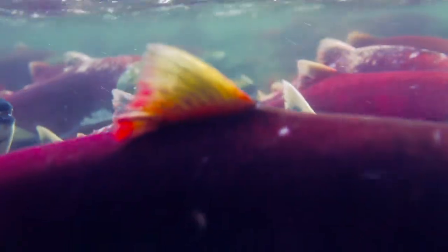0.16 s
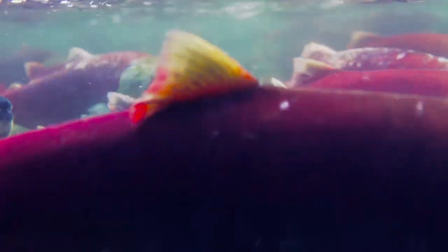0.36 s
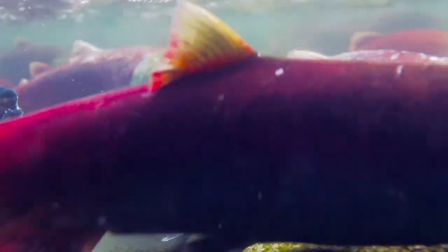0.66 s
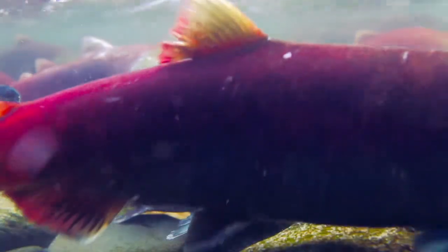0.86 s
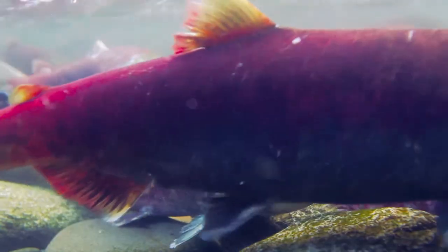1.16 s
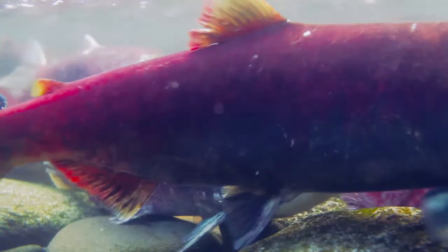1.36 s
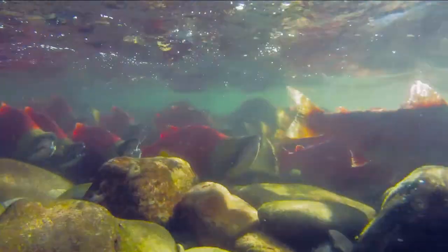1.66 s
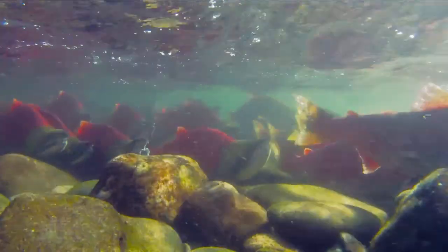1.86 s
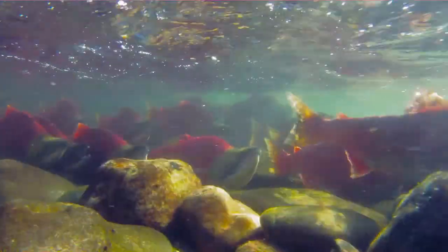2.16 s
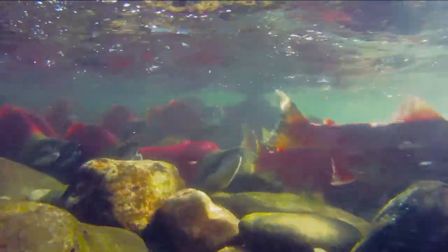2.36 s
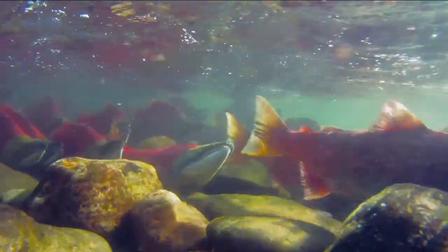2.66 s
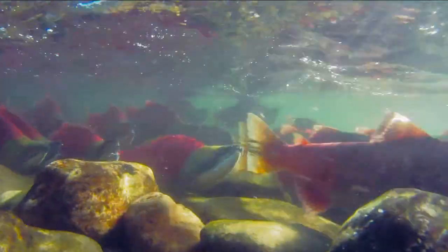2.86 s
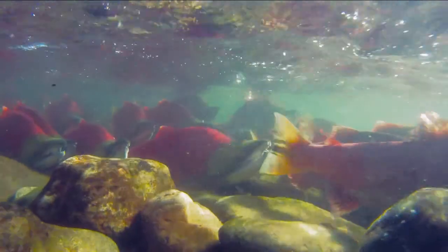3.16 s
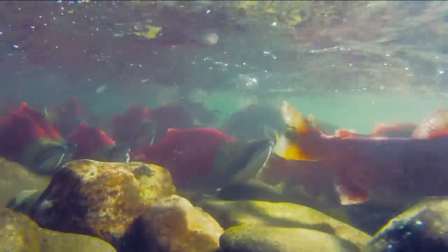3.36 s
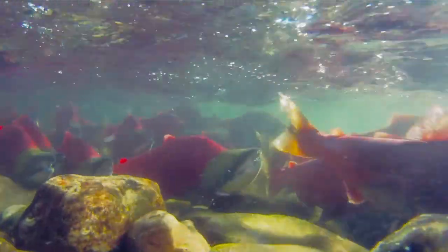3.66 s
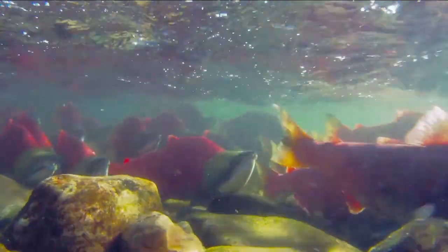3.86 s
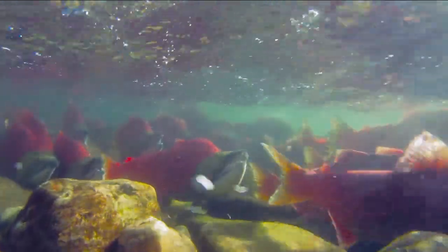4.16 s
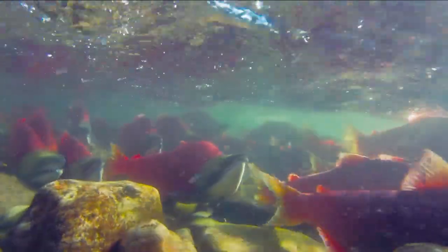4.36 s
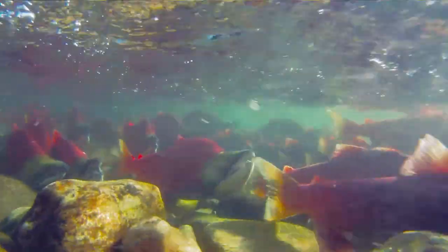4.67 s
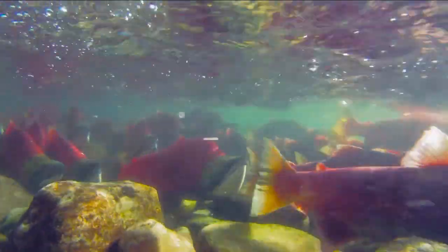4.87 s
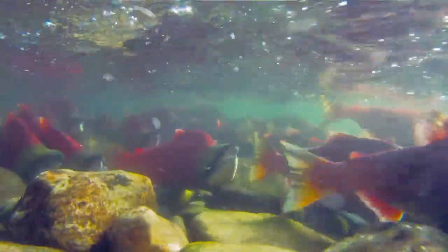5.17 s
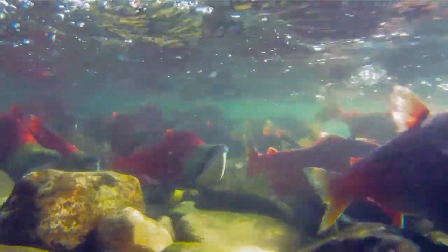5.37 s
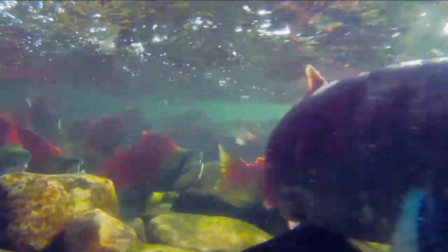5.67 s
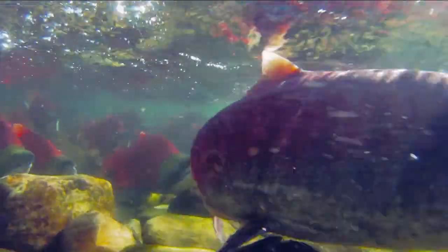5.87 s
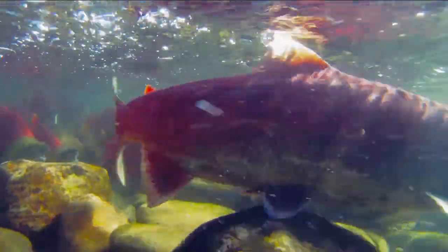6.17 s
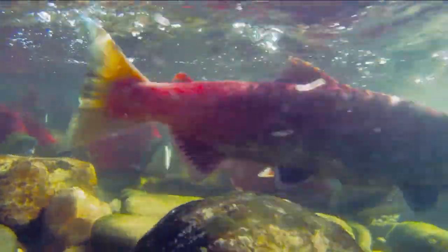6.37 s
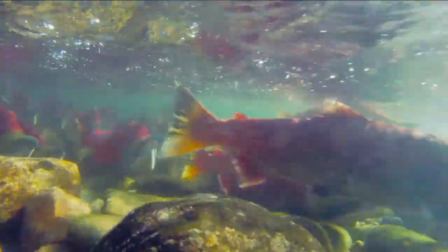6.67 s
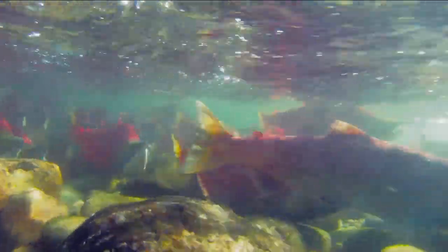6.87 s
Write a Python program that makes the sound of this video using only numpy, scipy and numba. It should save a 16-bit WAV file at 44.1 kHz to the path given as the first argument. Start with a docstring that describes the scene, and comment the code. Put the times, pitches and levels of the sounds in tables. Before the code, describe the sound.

A shallow stream rushes steadily over stones in open air, with crisp little splashes and a few bubbly plops around one and a half seconds. It fades by two and a half seconds into a quiet underwater sound: low soft rumble, faint simmer and isolated bubble pops. The bubbles gradually crowd together into hollow gurgling knocks, with grit ticking on the bed. The submerged microphone is very close, almost dry, with a glassy edge on each bubble.

```python
"""A shallow river, above and below the surface

From the bank, small bubbles, random kicks and noise merge into a rush over gravel, with noisy splashes.
It fades into the sound below: bubbles snap and ring, trapped air gurgles in knocks, and grit ticks in short
noise bursts, over a soft simmer of far bubbles and a low rumble of noise.
A sample-and-hold effect mirrors the underwater sound higher up, so every bubble gets a glassy glint."""
import sys
import numpy as np
from scipy import signal
from scipy.fft import rfft, irfft
from scipy.io import wavfile
from scipy.ndimage import uniform_filter1d
from numba import njit

SR = 44100
rng = np.random.default_rng(int(sys.argv[2]) if len(sys.argv) > 2 else 0)


def to_wav(s):
    """Save 16-bit WAV."""
    ch = np.atleast_2d(s).T  # columns
    pcm = np.round(np.clip(ch, -1, 1) * 32767)  # PCM
    wavfile.write(sys.argv[1], SR, pcm.astype(np.int16))


N = 309582
TIME = np.arange(N) / SR  # seconds

# the river in the open air, fading as the listener goes under: (time [s], level [dB], spray [dB])
RIVER_LEVELS = [(0, -23, -5.5), (.6, -22.5, -7.5), (1.42, -25, -8.5), (1.56, -23.5, -3), (1.74, -27.5, 1.5),
                (1.9, -27.5, 0.5), (2.3, -40, 1.5), (2.42, -43, -8), (2.52, -70, 2)]
# colour of the rushing water: (frequency [Hz], filter gain [dB])
RIVER_COLOUR = [(24, -37), (40, -12), (60, -11.5), (118, -12.5), (199, -2), (345, -8), (422, -5),
                (585, -10.5), (810, 1), (990, -6), (1520, -10), (2100, -9.5), (4340, -21.5), (6820, -19),
                (16000, -50)]
# hollows between the stones that ring with the rush: (frequency [Hz], width [Hz], level [dB])
STONE_HOLLOWS = [(237, 110, -18), (402, 190, -16), (710, 130, -16), (1900, 130, -6), (2498, 38, 2.5),
                 (3390, 850, -4.5)]
# wavelets that break on the stones: (time [s], level before fading [dB], decay [ms], centre [Hz])
SPLASHES = [(0.429, -26.5, 4.4, 6300), (0.653, -26.5, 4.6, 4200), (0.715, -23.5, 4.3, 4860),
            (1.458, -25.5, 5.5, 2970), (1.523, -17.5, 9, 2000), (1.571, -25.5, 12, 2000),
            (1.662, -18.5, 4.7, 2800), (1.722, -32, 20, 6230), (2.358, -35, 4.1, 4130)]
# single bubbles close by: (time [s], pitch [Hz], level [dB], swell [ms])
NEAR_BUBBLES = [(.594, 620, -24.5, 4), (1.091, 2310, -19.5, 1), (1.143, 2330, -13.5, 1),
                (1.452, 813, -9, 3.4), (1.485, 795, -23, 2.5), (1.576, 1190, -19, 1.3),
                (1.608, 756, -12, 2.8), (1.617, 1840, -14.5, 0.88), (1.797, 700, -17.5, 1.6),
                (2.142, 1830, -22.5, .5), (2.474, 1310, -21, 2.6), (2.498, 2990, -24.5, .8),
                (2.5, 1844, -18.5, 0.27), (2.52, 1542, -4.5, 0.97), (2.598, 1620, -23.5, 1.2),
                (2.607, 2200, -25.5, 0.55), (2.639, 1463, -25, 2.9), (2.65, 2220, -26, .5),
                (2.685, 2210, -18.5, 0.41), (2.704, 2300, -24, 0.34), (2.74, 754, -27.5, 3),
                (2.779, 1410, -32.5, 6.6), (2.878, 3340, -29.5, .5), (3.317, 790, -26, 4.6),
                (3.319, 2860, -32, .6), (3.367, 2320, -28, 0.66), (3.417, 2850, -23, .5),
                (3.422, 770, -23, 7.3), (3.728, 2030, -30, 0.34), (3.818, 1920, -28, 2.2),
                (3.822, 2400, -18, 3), (3.942, 3720, -22, 0.28), (3.954, 1400, -26.5, 4.8),
                (3.982, 1450, -30, 2.7), (4.101, 793, -22.5, 2.6), (4.158, 1740, -14, .2),
                (4.191, 3500, -22.5, 1.3), (4.231, 2630, -15, 0.24), (4.259, 767, -24, 7.1),
                (4.261, 2390, -21, 3.3), (4.266, 3460, -14, 0.16), (4.353, 1070, -31.5, 7.7),
                (4.654, 1504, -21, 11), (4.661, 4120, -21, 0.49), (4.689, 2670, -17, 0.13),
                (4.715, 3370, -21.5, .5), (4.783, 765, -20, 1.2), (4.792, 1324, -17, 5.7),
                (4.794, 1665, -14, 0.16), (4.854, 810, -19, 0.58), (4.875, 1075, -20, 19),
                (4.876, 816, -13, 2.9), (4.921, 1720, -18, 0.42), (4.951, 777, -19, 2.3),
                (4.951, 1504, -21, 4.4), (4.993, 2350, -25.5, 3.3), (5.004, 1406, -20.5, 0.46),
                (5.008, 717, -21.5, 2.2), (5.048, 624, -16.5, 0.59), (5.133, 1600, -13, 2),
                (5.14, 1073, -16.5, .3), (5.167, 2670, -21.5, 1), (5.532, 1885, -15.5, 0.27),
                (5.55, 1520, -23.5, 7), (5.568, 768, -24.5, 2.3), (5.617, 1580, -21, 0.26),
                (5.633, 803, -25, 4.5), (5.69, 1550, -15, 0.2), (5.73, 1920, -18.5, .3),
                (5.864, 3580, -19.5, 0.17), (5.865, 1465, -22, 2.3), (5.875, 740, -17.5, 1.1),
                (5.897, 2040, -24.5, 3.3), (6.024, 1174, -10.5, 1.3), (6.107, 2910, -16.5, 1.4),
                (6.125, 1540, -19.5, 2), (6.21, 734, -10, 1.2), (6.214, 3370, -12.5, 0.6),
                (6.533, 3560, -14, 0.17), (6.675, 1437, -10, 2.9), (6.677, 3370, -19.5, 0.68),
                (6.678, 738, -11.5, 1.4), (6.708, 3320, -14.5, 0.49), (6.761, 628, -23, 6.4),
                (6.834, 1200, -26, 3.1), (6.98, 1496, -18.5, 1.6)]
# strong eddies that knock the trapped air into a gulp: (time [s], level [dB])
GULPS = [(5.92, -19.5), (6.126, -14.5), (6.162, -13), (6.219, -20), (6.286, -24), (6.341, -19.5),
         (6.372, -22), (6.435, -22.5), (6.479, -17), (6.5, -14), (6.534, -20), (6.621, -21), (6.644, -13.5),
         (6.706, -21), (6.785, -13.5), (6.802, -17.5), (6.922, -24), (6.971, -14.5)]
# colour of the snap as a bubble pinches off: (frequency [Hz], filter gain [dB])
SNAP_COLOUR = [(60, -10), (350, 1), (900, -0.5), (1800, -3), (3200, -2), (5500, -28.5)]
# how hard the water is stirred, as the eddies rise and settle: (time [s], gurgle [dB], loose bubbles [dB])
STIRRING = [(.8, -59, -45), (1.55, -32, -33.5), (2.1, -64, -45.5), (2.55, -42, -38.5), (2.95, -73, -65),
            (3.4, -50, -44), (3.65, -74, -52), (4.05, -44.5, -50), (4.28, -36.5, -36.5),
            (4.45, -45.5, -40.5), (4.9, -40.5, -41), (5.22, -30.5, -32), (5.45, -39.5, -39),
            (5.85, -30.5, -27), (6.07, -34, -37.5), (6.35, -29.5, -31), (6.6, -33.5, -39.5),
            (7, -28.5, -30)]
# pitch of the trapped air, lower for a larger pocket: (time [s], pitch [Hz])
POCKET_PITCH = [(4.1, 780), (4.2, 624), (4.6, 723), (4.95, 746), (5.08, 593), (5.18, 503), (5.32, 510),
                (5.45, 683), (5.63, 758), (5.78, 543), (5.92, 507), (6.12, 624), (6.4, 656), (6.52, 702),
                (6.8, 749), (7, 558)]
# grains of grit that click on the stones: (time [s], level before colouring [dB])
GRIT_TICKS = [(2.8235, -38.5), (4.011, -36.5), (4.0565, -35.5), (4.4433, -40), (4.6801, -27),
              (4.953, -25.5), (5.4512, -32.5), (5.5036, -24), (5.5258, -31.5), (5.5846, -28), (5.67, -35.5),
              (5.6984, -29), (5.8629, -25), (6.318, -30), (6.3964, -36.5), (6.7392, -30.5), (6.803, -27.5),
              (6.902, -26)]
# colour of the grit: (frequency [Hz], filter gain [dB])
GRIT_COLOUR = [(60, -1.5), (350, 9.5), (900, -16.5), (2400, -2.5), (3600, 5), (4600, 0), (6000, -1)]
# the current under water: (time [s], simmer [dB], rumble [dB])
CURRENT_LEVELS = [(0, -80, -70), (1.1, -64, -43.5), (2.7, -44, -47.5), (3.2, -48.5, -49),
                  (4.9, -47.5, -42.5), (5.4, -44, -42.5), (7, -51, -43)]
# colour of the steady simmer: (frequency [Hz], filter gain [dB])
SIMMER_COLOUR = [(150, -16.5), (300, -0.5), (500, -10.5), (640, -10), (800, 1.5), (950, -52), (1070, -17),
                 (1200, -35), (1450, 0), (1750, -15.5), (2000, -1.5), (2330, -4), (2900, -14.5),
                 (4000, -24), (5500, -25)]
# colour of the low push of the flow: (frequency [Hz], filter gain [dB])
RUMBLE_COLOUR = [(12, 1), (35, -2), (60, -2.5), (90, -5), (120, 2), (145, -9), (180, -16.5), (400, -39.5)]

# a near bubble of RING_HZ rings for RING_MS; higher ones die sooner by a power of their pitch
RING_HZ, RING_MS, RING_POWER = 1610, 4.64, 0.63
GULP_SWELL_MS, GULP_DECAY_MS = 1.4, 12.8
# levels of the tiny bubbles and of the rolling grit against the loose bubbles
TINY_DB, ROLLING_DB = -14, -11.5
# how far the pocket's pitch strays (share), and how sharply it rings
POCKET_WOBBLE, POCKET_WIDTH_HZ = 0.024, 45
# extra churn at a near bubble or gulp, and how fast it settles
WAKE_DB, WAKE_S = 6.5, 0.025
# rate of the sample-and-hold, and the upper limit of the whole sound
HOLD_HZ, TOP_HZ = 12000, 15300


def river():
    """Countless small bubbles and droplets merge into a rush; wavelets splash on top."""
    level_db, spray_db = curves(RIVER_LEVELS)
    babble = swarm(count=6000, low_hz=185.8, high_hz=6960, cycles=5.25, spread_db=9.5, glide=0.083)
    # take out the bubbles' lean to the bass, so that the stream bed sets the colour
    babble = unit(signal.lfilter([1, -.97], 1, babble))
    droplets = kicks(rate=900, spread_db=14)
    rush = rng.standard_normal(N) + undb(-9.5) * babble + undb(-9) * droplets
    rush = colour(rush, RIVER_COLOUR)
    rush = rush + sum(undb(db) * resonance(rush, hz, width) for hz, width, db in STONE_HOLLOWS)
    rush = unit(signal.sosfilt(signal.butter(2, 55, "high", fs=SR, output="sos"), rush))
    # the treble swells and flickers with the spray
    treble = signal.sosfilt(signal.butter(1, 1800, "high", fs=SR, output="sos"), rush)
    spray_gain = undb(spray_db + 1.2 * walk(28.26) + 2.1 * walk(160))
    rush = rush + treble * (spray_gain - 1)
    return rush * undb(level_db + .5 * walk(12.0)) + splashes()


def splashes():
    """Wavelets break on the stones: bands of noise start sharply and die away."""
    out = np.zeros(N)
    drops = rng.standard_normal(N)
    for s, db, decay_ms, hz in SPLASHES:
        age_ms = np.maximum(TIME - s, 0) * 1000
        shape = (1 - np.exp(-age_ms * 2)) * np.exp(-age_ms / decay_ms)
        band = unit(resonance(resonance(drops, hz, 2400), hz, 2400))
        out += band * undb(db) * shape
    return out


def near_bubbles():
    """Close bubbles and gulps of trapped air each snap off and ring; lower single bubbles ring longer."""
    singles = [(s, hz, db, swell_ms, RING_MS * (RING_HZ / hz) ** RING_POWER)
               for s, hz, db, swell_ms in NEAR_BUBBLES]
    pocket_s, pocket_hz = np.transpose(POCKET_PITCH)
    gulps = [(s, np.interp(s, pocket_s, pocket_hz), db, GULP_SWELL_MS, GULP_DECAY_MS)
             for s, db in GULPS]
    rings, snaps = np.zeros(N), np.zeros(N)
    for s, hz, db, swell_ms, decay_ms in singles + gulps:
        add(rings, s, undb(db) * bubble(hz, swell_ms, decay_ms, glide=0.03))
        # snaps differ less in level than the rings do
        add(snaps, s, undb(.7 * db) * burst(decay_ms=3.5))
    return rings + undb(-10.5) * colour(snaps, SNAP_COLOUR)


def stirred_water():
    """Eddies knock a pocket of trapped air in fits and shed smaller bubbles."""
    gurgle_db, loose_db = curves(STIRRING)
    pocket_hz = curves(POCKET_PITCH)[0] * (1 + POCKET_WOBBLE * walk(25))
    knocks = kicks(rate=130, spread_db=1.0) * undb(1.64 * walk(20))
    # a sharp resonance, then a broad one at the same moving pitch
    gurgle = resonance(knocks, pocket_hz, POCKET_WIDTH_HZ)
    gurgle = unit(resonance(gurgle, pocket_hz, 370))
    middle = swarm(count=1100, low_hz=760, high_hz=2200, cycles=6, spread_db=15, glide=.06)
    tiny = swarm(count=650, low_hz=2300, high_hz=4200, cycles=6.5, spread_db=19, glide=.02)
    loose = middle * undb(-2.0) + tiny * undb(TINY_DB)
    return wake() * (gurgle * undb(gurgle_db) + loose * undb(loose_db))


def grit():
    """Grains roll and click on the bed in tiny noise bursts; the faint ones follow the stirring."""
    loose_db = curves(STIRRING)[1]
    loud, faint = np.zeros(N), np.zeros(N)
    for s, db in GRIT_TICKS:
        add(loud, s, undb(db) * burst(decay_ms=3.57))
    for when, strength in rng.random(size=(600, 2)):
        # the cube makes most grains weak and a few strong
        add(faint, when * TIME[-1], undb(22 * strength ** 3) * burst(decay_ms=1.6))
    rolling = unit(faint) * wake() * undb(loose_db + ROLLING_DB)
    return colour(undb(6.5) * loud + rolling, GRIT_COLOUR)


def current():
    """Far bubbles come in spurts and blur into a simmer over the low push of the flow."""
    simmer_db, rumble_db = curves(CURRENT_LEVELS)
    far = swarm(count=6000, low_hz=550, high_hz=4200, cycles=5, spread_db=6, glide=.05)
    # lift the treble, to favour the small bubbles
    far = unit(signal.lfilter([1, -.95], 1, far))
    fizz = kicks(rate=900, spread_db=0) * undb(2.0 * walk(90))
    simmer = unit(colour(far + undb(-0.5) * fizz, SIMMER_COLOUR))
    rumble = unit(colour(rng.standard_normal(N), RUMBLE_COLOUR))
    return simmer * undb(simmer_db + 4.1 * walk(16)) + rumble * undb(rumble_db)


def wake():
    """Gain of the churn that each near bubble or gulp leaves behind; it settles until the next."""
    starts = np.sort([row[0] for row in NEAR_BUBBLES + GULPS])
    latest = np.maximum(np.searchsorted(starts, TIME) - 1, 0)
    age = TIME - starts[latest]
    churn_db = WAKE_DB * np.exp(-np.abs(age) / WAKE_S) - 3.5
    return uniform_filter1d(undb(churn_db), size=160)


def stones(x, wet_db, t60_s):
    """Bed and surface scatter the sound into a short tail, which falls 60 dB in t60_s."""
    s = TIME[:SR // 5]
    tail = rng.standard_normal(len(s)) * undb(-60 * s / t60_s) * (s > .003)
    echo = signal.fftconvolve(x, tail / np.sqrt(np.sum(tail ** 2)))[:N]
    return x + undb(wet_db) * resonance(echo, 780, 1700)


def sample_and_hold(x):
    """Imitate held samples: their stair steps mirror the low band on both sides of the hold rate."""
    narrow = signal.sosfiltfilt(signal.butter(12, 5450, fs=SR, output="sos"), x)
    mirrored = narrow * (1 + 2 * undb(0.5) * np.cos(2 * np.pi * HOLD_HZ * TIME))
    # holding each value dulls the treble along a sinc curve
    hold_gain = np.sinc(np.fft.rfftfreq(N, 1 / SR) / HOLD_HZ)
    return irfft(rfft(mirrored) * hold_gain, N)


def bubble(hz, swell_ms, decay_ms, glide):
    """A bubble pinches off and rings; its pitch creeps up as it rises."""
    ms = 1000 * TIME[:int(SR * (swell_ms + 6 * decay_ms) / 1000)]
    shape = (1 - np.exp(-(ms / swell_ms) ** 2)) * np.exp(-ms / decay_ms)
    pitch = hz * (1 + glide * np.tanh((ms - swell_ms - decay_ms / 2) / (2 * decay_ms)))
    return shape / shape.max() * np.sin(2 * np.pi * np.cumsum(pitch) / SR)


def swarm(count, low_hz, high_hz, cycles, spread_db, glide):
    """Many bubbles of random size; small ones ring higher and, on the whole, shorter."""
    out = np.zeros(N)
    for k, (when, size, strength, damping) in enumerate(rng.random((count, 4))):
        hz = low_hz * (high_hz / low_hz) ** size
        decay_ms = 1000 * cycles * (.5 + damping) / hz
        ring = bubble(hz, decay_ms / 3, decay_ms, glide * damping)
        # spread evenly over the whole time, each start a little late by chance
        start = (k + 6 * when) / count * TIME[-1]
        add(out, start, undb(spread_db * strength ** 3) * ring)
    return unit(out)


def burst(decay_ms):
    """A short rough contact: noise that dies away, with its energy set by the decay."""
    ms = 1000 * TIME[:SR // 60]
    shape = np.exp(-ms / decay_ms)
    return unit(rng.standard_normal(len(ms)) * shape) * np.sqrt(np.mean(shape ** 2))


def kicks(rate, spread_db):
    """Random impulses of uneven size and either sign, about `rate` a second, scaled to rms 1."""
    hits = rng.random(N) < rate / SR
    sizes = undb(spread_db * rng.random(N))
    return unit(hits * sizes * rng.choice([-1, 1], N))


def walk(rate):
    """Smoothed random steps, `rate` a second, with a spread near 1."""
    k = int(SR / rate)
    steps = np.repeat(rng.standard_normal(N // k + 1), k)
    return unit(uniform_filter1d(steps, k)[:N])


def colour(x, points):
    """Filter through (Hz, dB) points without sound ahead of its cause (minimum phase)."""
    hz, db = np.transpose(points)
    size = 8192
    bins_hz = np.fft.rfftfreq(size, 1 / SR)
    log_gain = np.log(undb(np.interp(np.log(bins_hz + 1), np.log(hz), db)))
    # fold the cepstrum onto positive times, which makes the filter causal
    cepstrum = irfft(log_gain)[:size // 2]
    cepstrum[1:] *= 2
    return signal.fftconvolve(x, irfft(np.exp(rfft(cepstrum, size))))[:N]


@njit
def svf(x, hz, width):
    """State-variable band-pass with a moving centre."""
    y, b, l = np.empty(len(x)), 0., 0.
    for i in range(len(x)):
        g, k = np.tan(np.pi * hz[i] / SR), width / hz[i]
        v = (b + g * (x[i] - l)) / (1 + g * (g + k))
        b, l, y[i] = 2 * v - b, l + 2 * g * v, k * v
    return y


def resonance(x, hz, width_hz):
    """One resonance, fixed or moving, gain 1 at its centre."""
    return svf(x, hz * np.ones(N), float(width_hz))


def curves(table):
    """The columns of a table of timed rows, joined by straight lines."""
    s, *columns = np.transpose(table)
    return [np.interp(TIME, s, c) for c in columns]


def add(out, s, sound):
    """Mix a short sound in at time s."""
    i = int(np.clip(s * SR, 0, N - 1))
    out[i:i + len(sound)] += sound[:N - i]


def undb(db):
    """Decibels to gain."""
    return 10 ** (np.asarray(db) / 20)


def unit(x):
    """Scale to rms 1."""
    return x / np.sqrt(np.mean(x ** 2))


def scene():
    """The river from the bank, mixed with the underwater sound."""
    close = near_bubbles() + stirred_water() + grit()
    below = stones(close, wet_db=-9.5, t60_s=0.036) + current()
    return (river() + sample_and_hold(below))[None]


def record(dry):
    """A steep low-pass filter cuts the top of the treble."""
    return signal.sosfilt(signal.ellip(8, .2, 70, TOP_HZ, fs=SR, output="sos"), dry)


dry = scene()
out = record(dry)
to_wav(out)
```